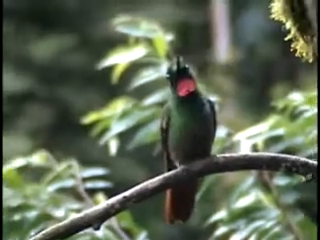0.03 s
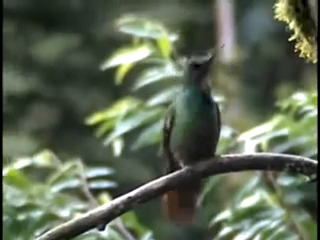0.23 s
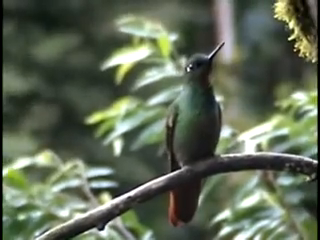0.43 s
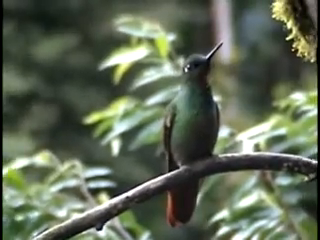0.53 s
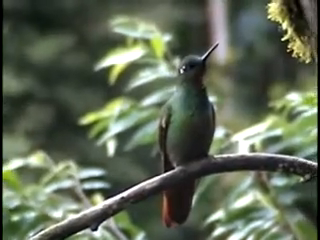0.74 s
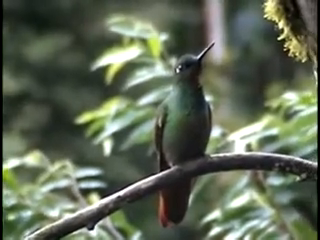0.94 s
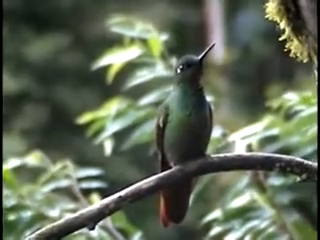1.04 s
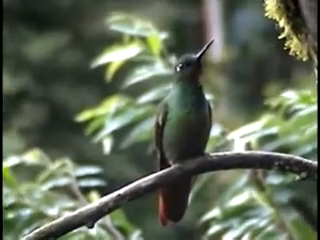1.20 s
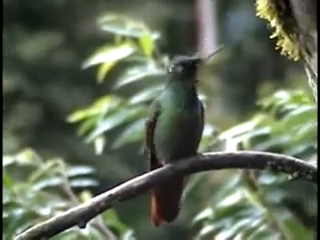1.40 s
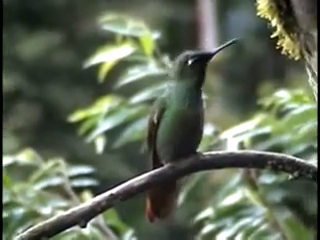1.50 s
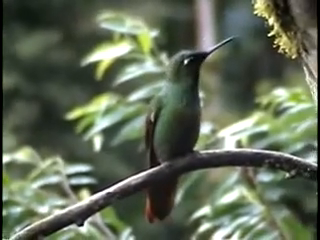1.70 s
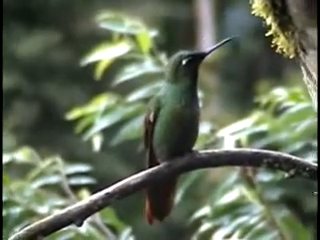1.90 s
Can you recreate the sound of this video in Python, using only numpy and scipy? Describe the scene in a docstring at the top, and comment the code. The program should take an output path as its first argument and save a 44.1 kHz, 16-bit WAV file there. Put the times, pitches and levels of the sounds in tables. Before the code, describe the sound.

A hummingbird squeaks twice over faint forest air and microphone hiss.

```python
"""In a forest, a perched hummingbird squeaks twice, close to a camera.
Each squeak is a clean harmonic tone from the syrinx that flicks up and sags; leaves scatter it back.
Beneath lies a bed of forest air, microphone hiss and thin whining tones, with three faint hoots,
a tiny tick and a dull click. The sound starts late, after a faint idle hum, and drops out once."""
import sys
import numpy as np
from scipy import signal
from scipy.fft import rfft, irfft
from scipy.io import wavfile
from scipy.ndimage import uniform_filter1d

SR = 44100
rng = np.random.default_rng(int(sys.argv[2]) if len(sys.argv) > 2 else 0)


def to_wav(s):
    """Save 16-bit WAV."""
    ch = np.atleast_2d(s).T  # columns
    pcm = np.round(np.clip(ch, -1, 1) * 32767)  # PCM
    wavfile.write(sys.argv[1], SR, pcm.astype(np.int16))


N = 85995

# stereo balance of the background: f/Hz, left minus right/dB
BED_PAN = [(60, -3), (200, -8), (380, -9.5), (750, -10.5), (1200, -3.5), (2200, -2.5), (2700, -5),
           (3600, 0.5), (8000, 0)]
# how alike the two sides of the background are: f/Hz, correlation
BED_LIKENESS = [(60, 0.15), (1500, 0), (2900, 0.31), (3600, 0.99), (7000, .99), (15000, 1)]


def amp(db):
    """Decibels to gain."""
    return 10 ** (np.asarray(db) / 20)


def unit_rms(x):
    """Scales to rms 1."""
    return x / np.sqrt(np.mean(x ** 2) + 1e-20)


def curve(points, hz):
    """Reads a table on a log-frequency axis."""
    f, value = np.transpose(points)
    return np.interp(np.log(hz + 1), np.log(f + 1), value)


def add(mix, start_s, sound):
    """Mixes a sound in at a time."""
    part = mix[round(start_s * SR):][:len(sound)]
    part += sound[:len(part)]


def bins():
    """Frequencies of a whole-length spectrum."""
    return np.fft.rfftfreq(N, 1 / SR)


def equalise(x, points):
    """Filters by a table of gains."""
    return irfft(rfft(x) * amp(curve(points, bins())), N)


def panned(x, points):
    """Shares each frequency between left and right at constant power."""
    ratio = amp(curve(points, bins()))
    return irfft(rfft(x) * np.array([ratio, np.ones_like(ratio)]) * np.sqrt(2 / (1 + ratio ** 2)), N)


def wander(rate_hz, size=N):
    """Smooth random modulation of about rms 1, rolling off above a rate."""
    control_hz, points = 2000, 4096
    lowpass = np.exp(-(np.fft.rfftfreq(points, 1 / control_hz) / rate_hz) ** 2)
    slow = unit_rms(irfft(rfft(rng.standard_normal(points)) * lowpass))
    return np.interp(np.arange(size) * control_hz / SR, np.arange(points), slow)


def idle_hum():
    """Two faint steady tones over a bass-heavy noise floor."""
    tones = [(48.4, -80), (581.4, -95.5)]  # hum tones: f/Hz, level/dB
    floor_eq = [(20, -8.5), (48, 0.5), (80, -15.5), (250, -22), (700, -30), (2000, -37.5), (8000, -39.5),
                (15000, -41)]  # colour of the noise floor: f/Hz, relative level/dB
    width = [(60, -25), (200, -10), (700, -13), (2000, -1), (4400, -13)]  # its stereo width: f/Hz, side minus mid/dB
    t = np.arange(N) / SR
    hum = sum(amp(db) * np.sqrt(2) * np.sin(2 * np.pi * hz * t) for hz, db in tones)
    mid, side = amp(-83) * unit_rms(equalise(rng.standard_normal((2, N)), floor_eq))
    return hum + mid + equalise(np.array([side, -side]), width)


def hiss():
    """Forest air and microphone hiss, diffuse and slowly swelling in the bass, centred in the treble."""
    hiss_eq = [(20, -18.5), (35, -10), (50, -1.5), (75, -5), (130, -4.5), (330, 0.5), (520, 0.5),
               (750, 2.5), (1050, -4), (1500, -7), (2150, -13), (2700, -8), (3800, -15), (5000, -13.5),
               (6500, -12.5), (7600, -18.5), (9500, -27.5), (11200, -30.5), (13000, -33.5), (15500, -46.5)]  # colour of the air and hiss: f/Hz, relative level/dB
    air_swell = [(.16, -0.5), (.35, -0.5), (.6, -1.5), (.75, 2), (.93, -0.5), (1.1, 1.5), (1.4, -2.3),
                 (1.6, -0.5), (1.9, 2)]  # rise and fall of the low forest air: t/s, level/dB
    air_top_hz, patch_db = 900, 1
    left, other = rfft(rng.standard_normal((2, N))) * amp(curve(hiss_eq, bins()))
    likeness = curve(BED_LIKENESS, bins())
    right = likeness * left + np.sqrt(1 - likeness ** 2) * other
    noise = unit_rms(panned(irfft([left, right], N), BED_PAN))
    hz, t, spectra = signal.stft(noise, SR, nperseg=512, noverlap=384)
    # slightly louder and softer patches, smooth across frequency and time
    patches = uniform_filter1d(rng.standard_normal(spectra.shape[1:]), size=4, axis=0)
    patches = unit_rms(uniform_filter1d(patches, size=14, axis=1))
    swell_db = np.outer(1 / (1 + (hz / air_top_hz) ** 4), np.interp(t, *np.transpose(air_swell)))
    _, bed = signal.istft(spectra * amp(patch_db * patches + swell_db), nperseg=512, noverlap=384)
    return amp(-54) * unit_rms(bed[:, :N])


def whine():
    """Many thin, slightly wavering tones, probably the camera's own mechanism."""
    tones = [(360, -66), (658, -76), (897, -69.5), (921, -64.5), (1140, -76), (1590, -75.5), (1745, -81.5),
             (1988, -74), (2460, -75), (2535, -76.5), (2622, -70), (2682, -66), (2908, -69), (3011, -73.5),
             (3129, -76.5), (3204, -70), (3497, -69), (3576, -69), (3994, -77.5), (4118, -83.5),
             (4222, -76.5), (4667, -79), (5238, -82.5), (5336, -71), (5388, -78.5), (5561, -79),
             (6008, -72.5), (6282, -76.5), (6508, -77.5), (6568, -78), (6675, -77.5), (6901, -84),
             (7127, -82), (7348, -82), (8500, -81.5), (9959, -93), (11057, -84.5), (11125, -89)]  # thin tones in the hiss: f/Hz, level/dB
    waver_hz, shimmer_db, rate_hz = 3.85, 1.74, 24.8
    out = np.zeros((2, N))
    for hz, db in tones:
        phase = 2 * np.pi * (np.cumsum(hz + waver_hz * wander(rate_hz)) / SR + rng.random())
        lead = np.arccos(curve(BED_LIKENESS, hz))  # as wide as the hiss around it
        out += amp(db + shimmer_db * wander(rate_hz)) * np.sin([phase + lead, phase])
    return np.sqrt(2) * panned(out, BED_PAN)


def squeak(length, level_db, top_hz, sag_hz, fade_db, bright_db, dulling_db):
    """The syrinx sweeps its harmonics through the throat: weaker, duller and rougher as the pitch sags."""
    harmonics = [0, -0.5, 1, -2.5, -9, -13.5, -21]  # the syrinx's harmonics, first to seventh: level/dB
    throat = [(1400, -10), (2000, -8.5), (3000, -19), (3900, -7), (4600, -9.5), (5400, -5), (6050, -2.5),
              (7000, -10), (8000, -12), (10000, -19), (12000, -20), (14200, -22.5)]  # resonances of throat and bill: f/Hz, gain/dB
    flick_hz, flick_s, drop_hz, drop_s = 617.5, 0.0062, 110, 0.0029
    attack_s, release_s = 0.0024, 0.00099
    t = np.arange(0, length, 1 / SR)
    sag = (t / length) ** 2.1  # 0 to 1, speeding up
    roughness = 0.7 + 0.6 * sag
    flick = flick_hz * np.exp(-(t / flick_s) ** 1.53)  # the pitch starts low and flicks up
    drop = drop_hz * np.exp((t - length) / drop_s)  # and collapses at the very end
    hz = top_hz - flick - sag_hz * sag - drop
    jitter = 0.0059 * roughness * wander(rate_hz=450, size=len(t))
    phase = 2 * np.pi * np.cumsum(hz * (1 + jitter)) / SR
    tone = 0
    for k, db in enumerate(harmonics, 1):
        flutter_db = 1.16 * roughness * np.sqrt(k / 2) * wander(rate_hz=127, size=len(t))
        tilt_db = (bright_db + dulling_db * sag) * (k - 2.5)
        tone += amp(db + curve(throat, k * hz) + tilt_db + flutter_db) * np.sin(k * phase)
    envelope = np.minimum(t / attack_s, 1) * np.minimum((length - t) / release_s, 1)
    return np.sqrt(2) * tone * envelope * amp(level_db + fade_db * sag ** 2)


def forest_echo(call):
    """A few leaves reflect the call at once; the foliage all around adds a short faint tail."""
    leaves = [(.0046, -16.5), (0.0102, -23), (.021, -27)]  # early reflections off nearby leaves: delay/s, level/dB
    foliage_eq = [(2000, 1), (4000, -2.5), (5800, 1.5), (8000, -1), (12000, 4.5)]  # colour of the scattered sound: f/Hz, gain/dB
    tail_db, t60_s, build_s, width = -15.5, 0.27, 0.0069, 0.22
    scattered = equalise(call, foliage_eq)
    t = np.arange(SR // 2) / SR
    mid, side = rng.standard_normal((2, len(t))) * amp(-60 * t / t60_s) * np.minimum(t / build_s, 1)
    tails = np.array([mid + width * side, mid - width * side]) / np.linalg.norm(mid)
    early = np.zeros(N)
    for delay, db in leaves:
        add(early, delay, amp(db) * scattered)
    return early + amp(tail_db) * signal.fftconvolve(scattered[None], tails, axes=1)[:, :N]


def hummingbird():
    """Both squeaks with their echoes, reaching the two microphones slightly out of step."""
    # the calls: t/s, length/s, level before the throat/dB, top pitch/Hz, sag/Hz, fade/dB,
    # brightness/dB per harmonic, dulling at the end/dB per harmonic
    squeaks = [(0.2297, 0.098, -36.5, 2032, 225.5, -7.5, 0.2, -2.2),
               (1.5629, 0.098, -36, 2022, 220, -5.5, -0.33, -1.4)]
    left_lead = [(1400, 1.8), (2100, 1.25), (2900, 0.38), (3500, .08), (6000, 0.09), (15000, 0.13)]  # phase lead of the left microphone: f/Hz, lead/rad
    balance = [(2000, -7), (3900, 0.5), (5900, 1.3), (10000, 1)]  # stereo balance of the bird: f/Hz, left minus right/dB
    calls = np.zeros(N)
    for start, *voice in squeaks:
        add(calls, start, squeak(*voice))
    phase_shift = np.exp(0.5j * np.outer([1, -1], curve(left_lead, bins())))
    stereo = irfft(rfft(calls + forest_echo(calls)) * phase_shift, N)
    return panned(stereo, balance)


def hoots():
    """Soft, nearly pure notes that barely rise out of the hiss."""
    notes = [(.235, 0.081, 735.4, -58), (.835, 0.04, 749, -52), (1.074, 0.031, 749, -53.5)]  # short background hoots: t/s, length/s, f/Hz, level/dB
    out = np.zeros(N)
    for start, length, hz, db in notes:
        t = np.arange(0, length, 1 / SR)
        add(out, start, amp(db) * np.sin(np.pi * t / length) * np.sin(2 * np.pi * hz * t))
    return panned(out, BED_PAN)


def tick():
    """One tiny bright tick of high-passed noise."""
    start_s, decay_s, low_cut_hz = 0.5678, 0.0007, 11000
    t, out = np.arange(SR // 100) / SR, np.zeros(N)
    add(out, start_s, amp(-50.5) * rng.standard_normal(len(t)) * np.exp(-t / decay_s))
    return signal.lfilter(*signal.butter(2, low_cut_hz, "high", fs=SR), out)


def click():
    """A soft dull click, perhaps the bill or the perch."""
    body_eq = [(100, -20), (400, -3), (900, 4), (1600, -5), (3000, -16), (8000, -42)]  # colour of the click: f/Hz, relative level/dB
    start_s, attack_s, decay_s = 1.6575, 0.00091, 0.0056
    t, out = np.arange(SR // 20) / SR, np.zeros(N)
    burst = unit_rms(equalise(rng.standard_normal(N), body_eq))[:len(t)]
    envelope = np.minimum(t / attack_s, 1) * np.exp(-t / decay_s)
    add(out, start_s, amp(-45) * burst * envelope)
    return panned(out, BED_PAN)


def scene():
    """The bird over the background bed and its small sounds."""
    return hummingbird() + hiss() + whine() + tick() + click() + hoots()


def record(dry):
    """Idle hum gives way to the scene, which cuts out once; a steep low-pass trims the top."""
    on_spans = [(0.1583, .931), (1.0606, 2)]  # stretches in which the sound is on: from/s, to/s
    t = np.arange(N) / SR
    gate = sum((t >= on) & (t < off) for on, off in on_spans)
    gated = dry * gate + idle_hum() * (t < on_spans[0][0])
    lowpass = signal.firwin(511, cutoff=15800, window=("kaiser", 9), fs=SR)
    return signal.oaconvolve(gated, lowpass[None], "same")


dry = scene()
out = record(dry)
to_wav(out)
```